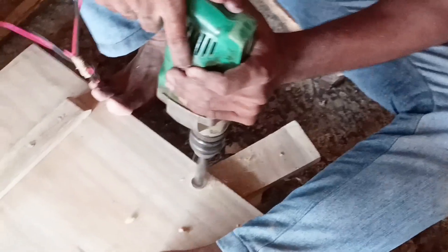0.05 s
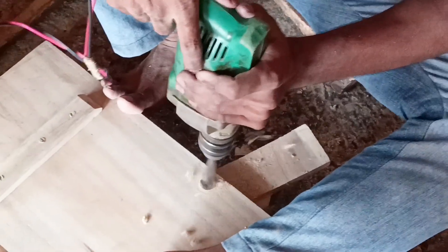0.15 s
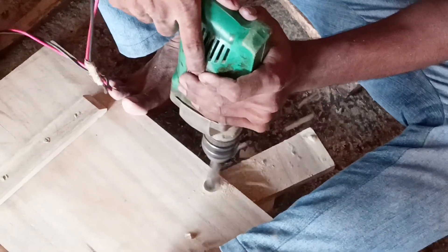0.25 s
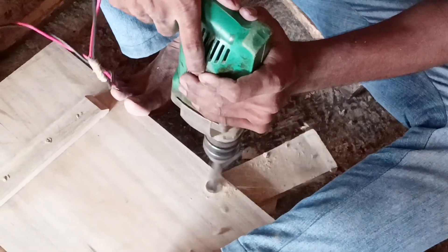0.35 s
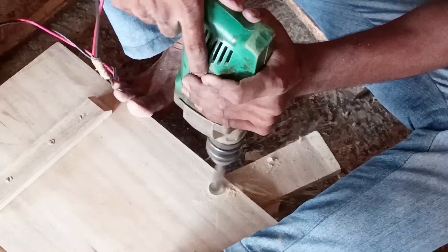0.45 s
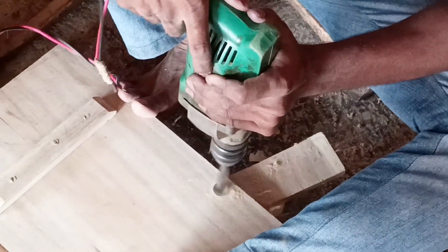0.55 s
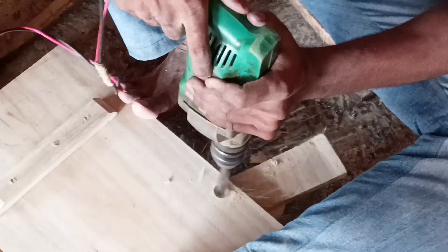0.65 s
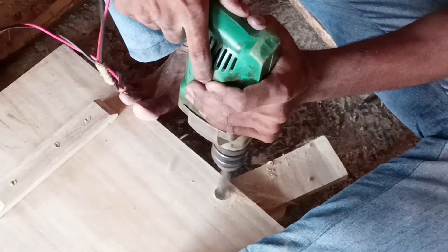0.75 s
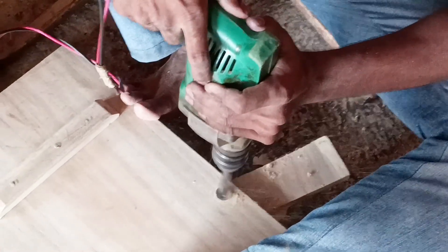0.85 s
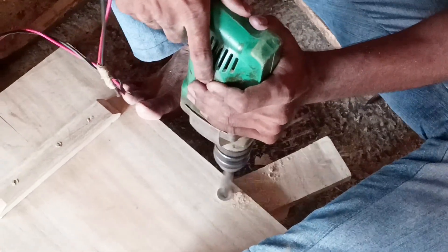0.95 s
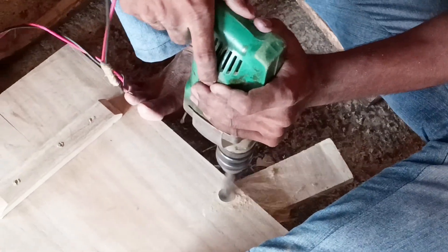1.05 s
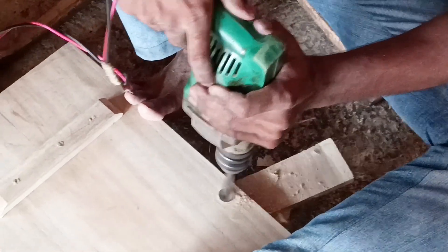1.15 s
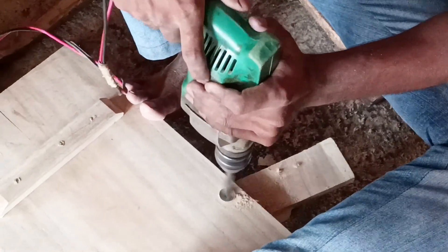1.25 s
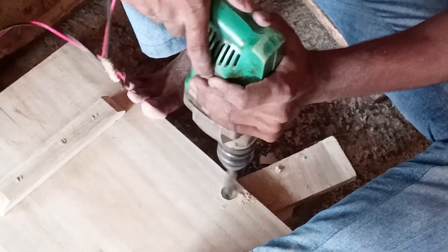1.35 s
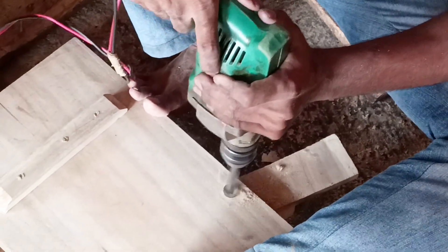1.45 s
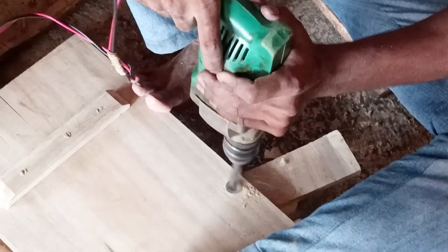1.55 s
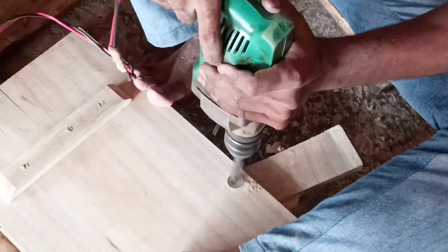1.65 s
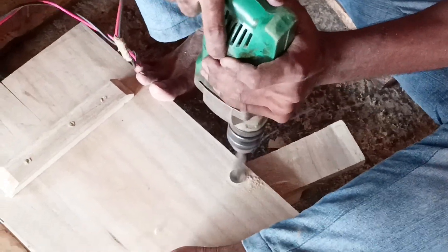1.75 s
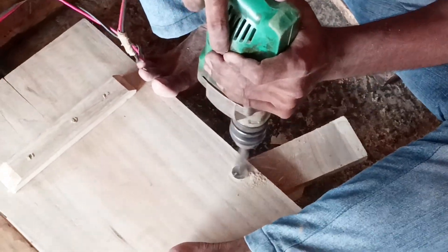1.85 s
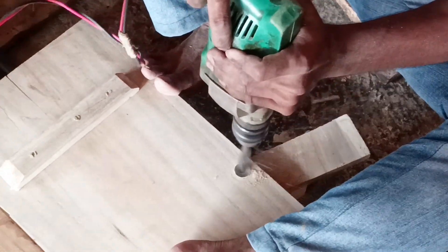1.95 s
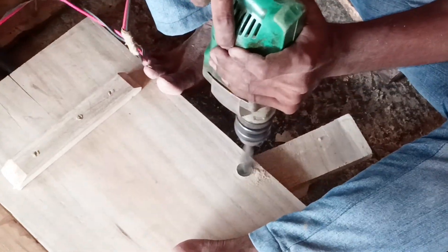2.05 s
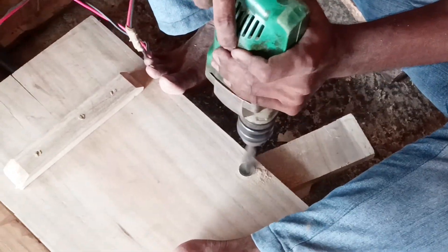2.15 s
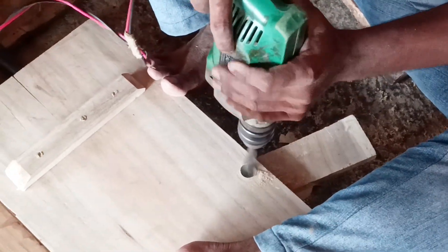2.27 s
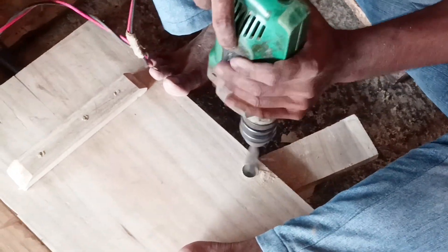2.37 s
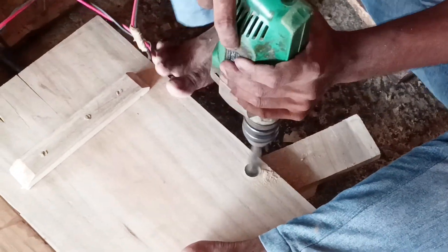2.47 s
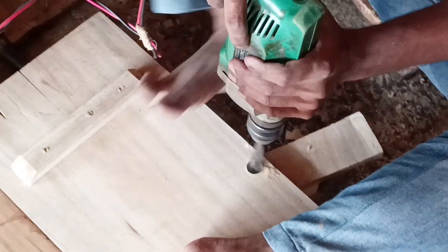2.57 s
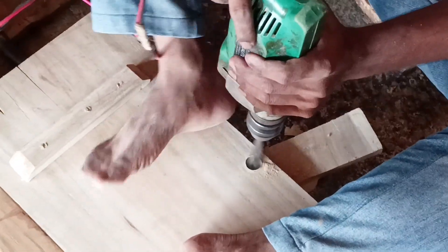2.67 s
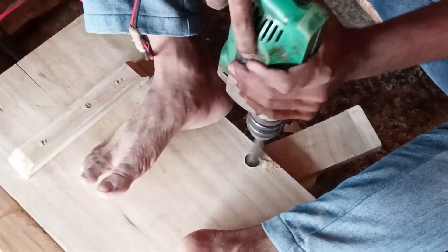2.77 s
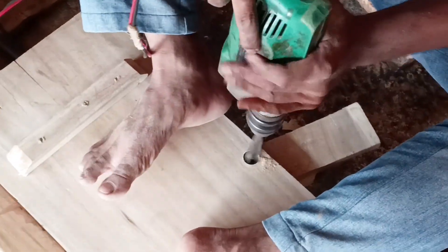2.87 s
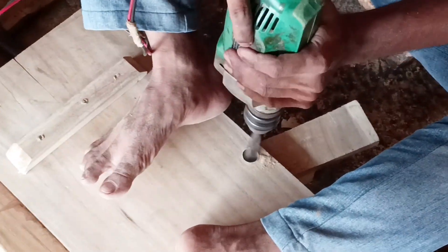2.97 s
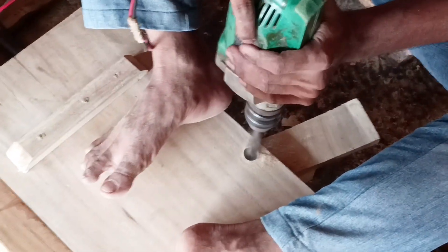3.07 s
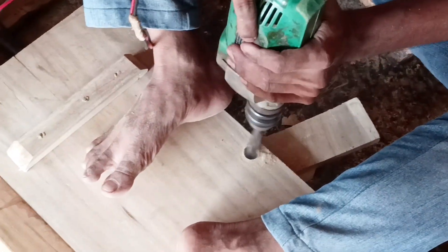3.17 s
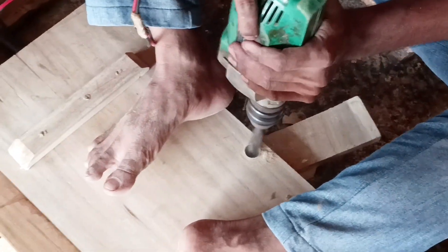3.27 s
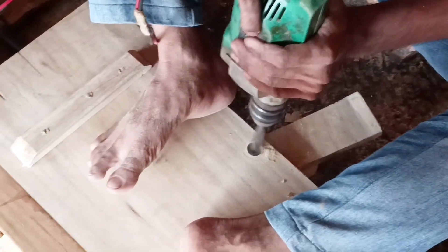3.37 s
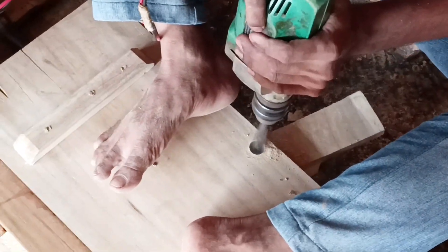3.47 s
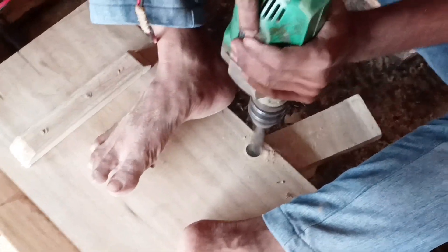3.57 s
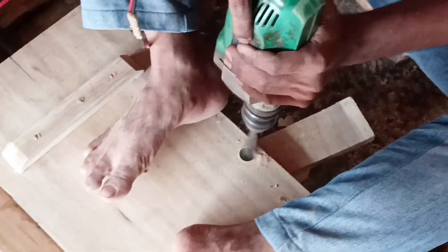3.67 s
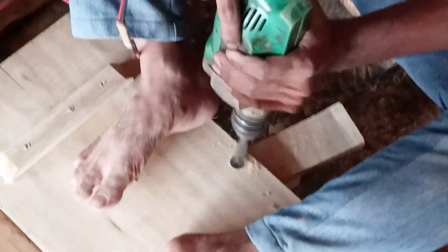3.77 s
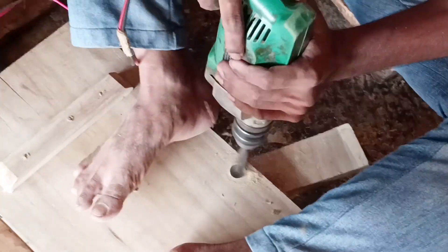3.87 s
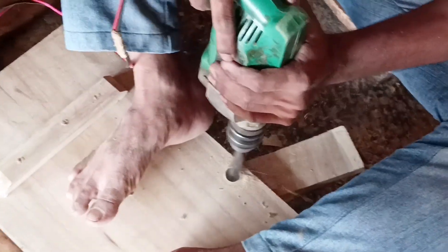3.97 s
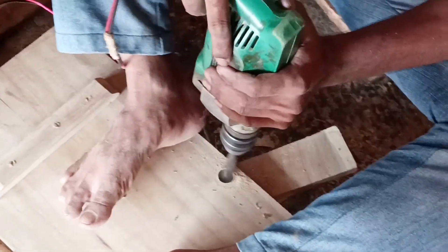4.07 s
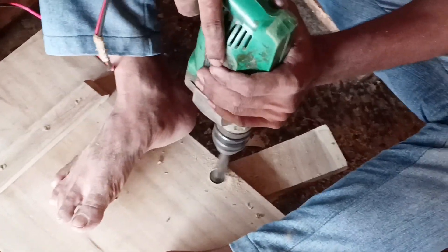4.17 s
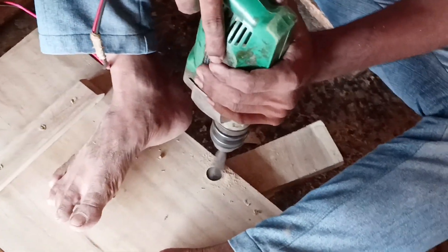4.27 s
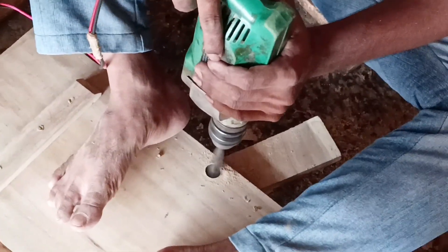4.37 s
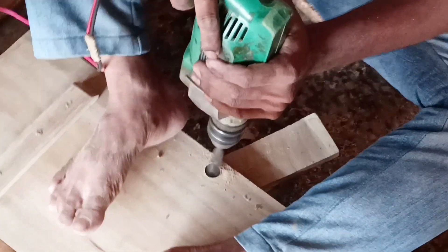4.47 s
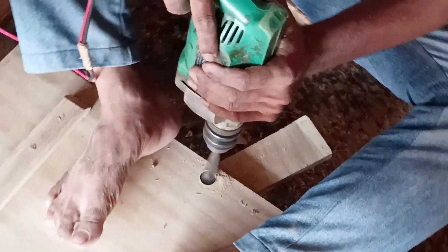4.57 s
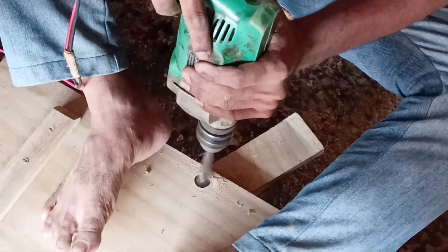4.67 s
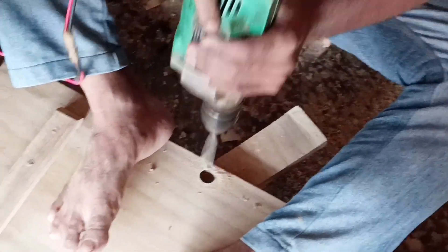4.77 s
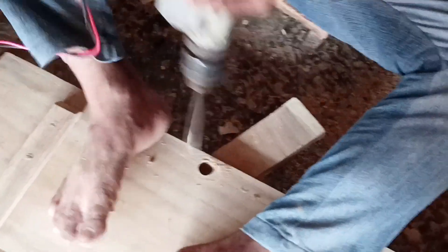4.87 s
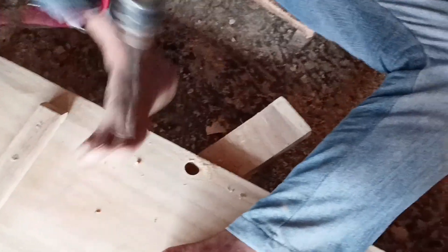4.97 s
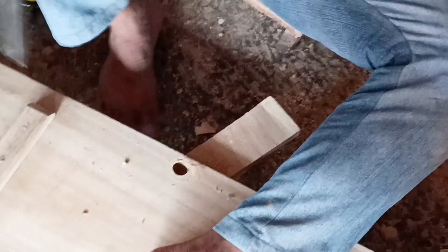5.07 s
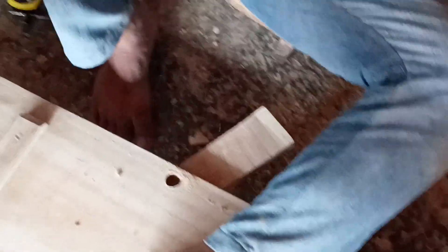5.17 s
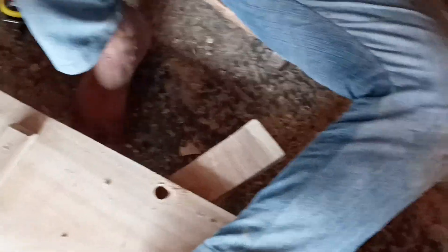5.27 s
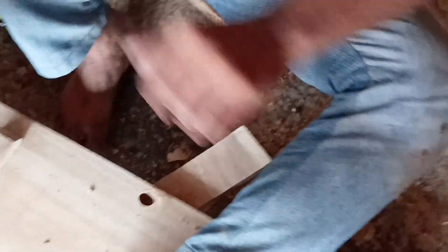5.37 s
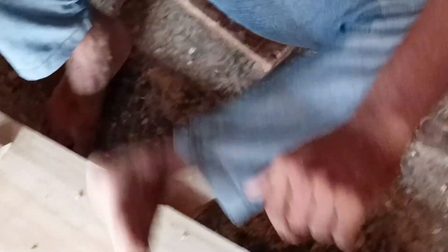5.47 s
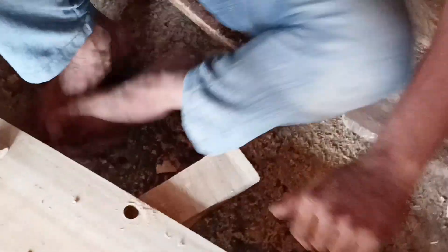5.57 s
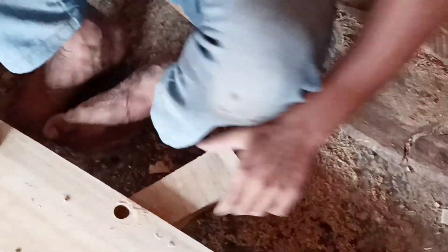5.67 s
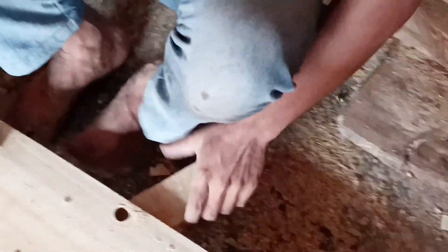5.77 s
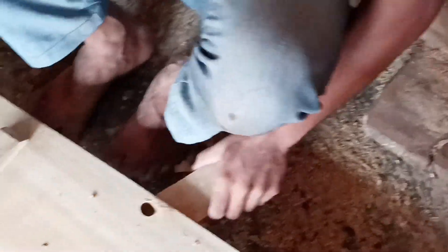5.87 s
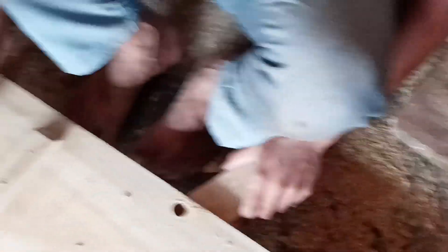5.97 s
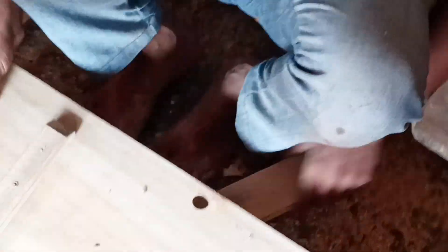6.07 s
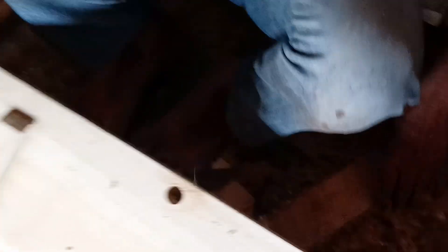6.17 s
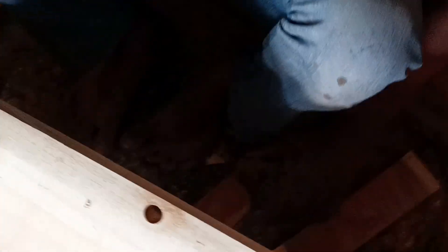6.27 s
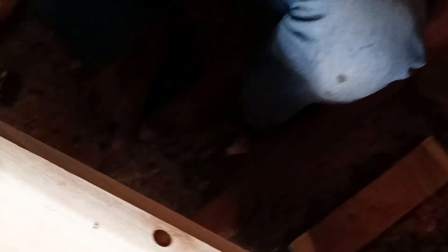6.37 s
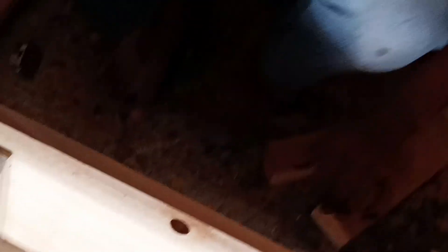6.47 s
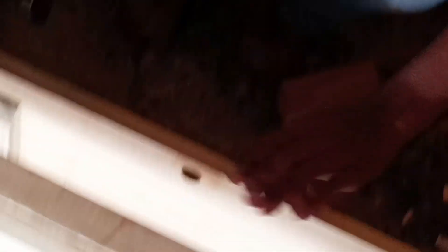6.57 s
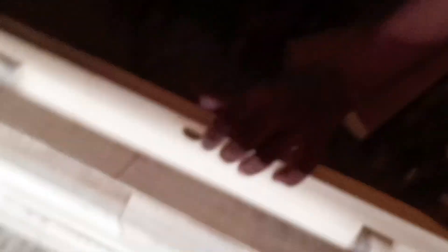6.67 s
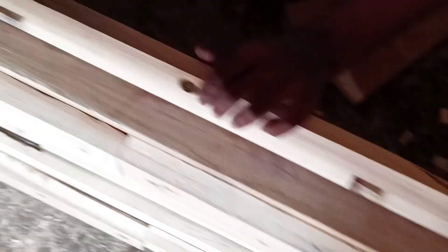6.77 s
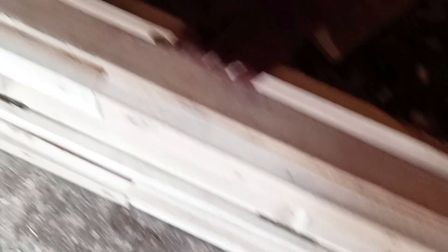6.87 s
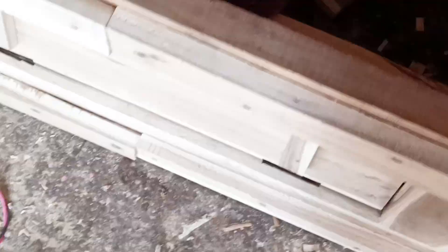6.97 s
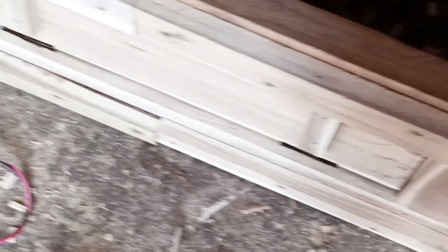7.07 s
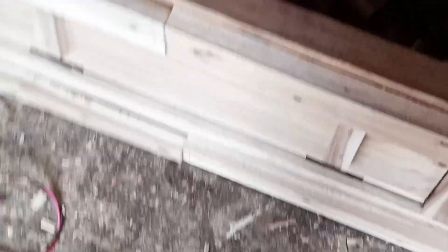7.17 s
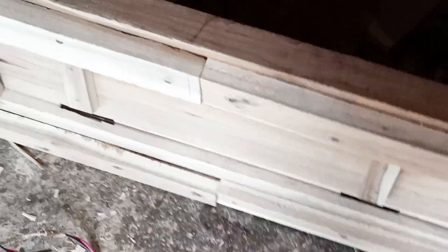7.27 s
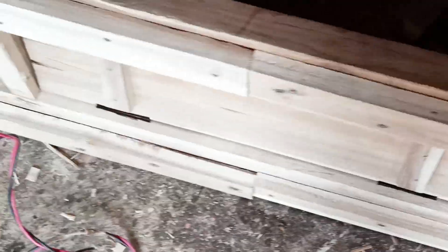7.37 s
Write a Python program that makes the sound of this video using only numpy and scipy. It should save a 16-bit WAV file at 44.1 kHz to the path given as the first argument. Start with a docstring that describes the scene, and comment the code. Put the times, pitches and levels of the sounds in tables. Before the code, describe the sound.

A corded drill whines and rasps into a wooden panel in four short runs, coasts down to silence, then tool and wood knocks follow.

```python
"""A corded drill bores into a wooden panel in four short runs: wavering sines locked to its speed make
the gear whine, and noise in bands and narrow rings makes the fan, panel and cutting sounds.
It coasts to a stop. Short grainy bursts ring like the drill laid down and like wood knocked and moved.
Two rough sines make a brief far-off toot; low noise makes moving air puff at the two microphone ports.
Under it all lies the murmur of the shop, a soft noise that swells in five bands."""
import sys
import numpy as np
from scipy import signal
from scipy.fft import rfft, irfft, next_fast_len
from scipy.io import wavfile
from scipy.ndimage import uniform_filter1d

SR = 44100
rng = np.random.default_rng(int(sys.argv[2]) if len(sys.argv) > 2 else 0)


def int16_out(signal):
    """Quantize to a 16-bit WAV file."""
    q = np.round(np.clip(np.atleast_2d(signal).T, -1, 1) * 32767)
    wavfile.write(sys.argv[1], SR, q.astype(np.int16))


N = 327212
STEP = 64   # samples between control points

# Levels in the tables are starting values: the functions add their own offsets and wavering.
# Drill speed, smoothed later; four pulls with coasting between: (time [s], gear mesh [Hz])
DRILL_SPEED = [(0.0, 1550), (0.07, 2029), (0.14, 2355), (0.22, 2527), (0.3, 2625), (0.379, 2671),
               (0.461, 2677), (0.54, 2730), (0.721, 2752), (0.821, 2783), (1.03, 2766), (1.1, 2684),
               (1.27, 2084), (1.4, 1696), (1.45, 2034), (1.5, 2318), (1.58, 2596), (1.661, 2654),
               (1.84, 2823), (1.93, 2872), (2.14, 2883), (2.21, 2728), (2.499, 1884), (2.75, 1310),
               (2.92, 1107), (3.001, 2107), (3.05, 2460), (3.109, 2614), (3.2, 2835), (3.301, 2878),
               (3.399, 2895), (3.52, 2975), (3.69, 2435), (3.761, 2648), (3.86, 2794), (3.95, 2510),
               (4.14, 2092), (4.37, 1593), (4.639, 1130), (4.75, 1015), (5.45, 398)]
# Pulls of the trigger: (on [s], off [s], mesh whine [dB], slot tone [dB], mesh octave [dB],
# armature hum [dB], third partial in coasting [dB], extra octave in the run-up [dB],
# extra body rings below 1.4 kHz [dB], extra body rings from 1.4 to 2 kHz [dB]); tones are re the roar
TRIGGER_PULLS = [(-0.1, 1.113, -7.5, -15.5, -32, -12.5, -2, 21, 6, 5.1),
                 (1.395, 2.179, -6, -10, -27.5, -12, -4.5, 13.1, 2.2, 0.5),
                 (2.927, 3.558, -8.5, -5.5, -28.5, -6, -15, 15.7, 3.5, 8.5),
                 (3.688, 3.891, -11.5, -4, -19, -17, -22, 6.2, 4.3, 6.7)]
# Roughness of the slot tone's pitch in each pull, before tone() scales it: (roughness [Hz])
SLOT_BLUR = [70, 50, 12, 45]
# How hard the gear teeth sing: (time [s], added to the whine [dB])
TEETH_SINGING = [(0, 5), (0.09, -4), (0.12, 2), (0.16, -0.5), (0.21, -0.5), (0.26, -5), (0.35, -2),
                 (0.47, 7.5), (0.56, 1.5), (0.6, -6), (0.66, -8), (0.69, 4.5), (0.75, 3), (1.0, 4),
                 (1.1, 4), (1.15, 2), (1.24, -3), (1.3, 1), (1.36, -15), (1.45, -8), (1.5, 6.5), (1.55, 6),
                 (1.95, -6), (2.1, -26), (2.32, 3), (2.4, -2.5), (2.5, -9), (2.63, 11), (2.9, -21.5),
                 (3.035, -5), (3.055, 1.5), (3.3, -3), (3.42, -6.5), (3.51, 4.5), (3.58, -22), (3.64, 1.5),
                 (3.94, 8), (3.99, -12), (4.25, -21.5), (4.36, 9.5), (4.5, -3), (4.58, -8), (4.64, 14.5),
                 (4.69, 6.5), (4.85, -22)]
# How two tones come and go in the roar: (time [s], slot tone [dB], mesh octave [dB])
TONE_STRANDS = [(0, 0, 0), (0.1, 0, 2), (0.14, 0, -4), (0.2, 0, 3), (0.3, -2, 4), (0.4, -8, -5),
                (0.7, -2, -6), (1.4, -3, -3), (1.47, 6, 0), (1.51, 4, -4), (1.56, -2, -2), (1.62, -6, -4),
                (1.7, -6, 2), (1.78, -4, -5), (2.1, 0, -6), (2.25, -3, -4), (2.32, 1, -9), (2.6, -6, -9),
                (2.95, -8, 0), (3.04, -8, 5), (3.13, -10, 4), (3.17, 3, 5), (3.23, 0, -9), (3.3, -5, -12),
                (3.36, 0, -10), (3.5, -1, -10), (3.54, -4, -8), (3.6, 0, -8), (3.64, -12, -10),
                (3.73, -3, -12), (3.76, -15, -9), (3.81, -5, -6), (3.87, -7, -2), (3.91, -16, -10),
                (4.0, -10, -12), (4.08, -4, -10), (4.2, 6, -8), (4.26, -8, 3), (4.31, -8, 0),
                (4.38, -8, -5), (4.45, -10, -10), (4.62, -8, -1), (4.72, -10, -8)]
# Noise of the drill: (time [s], roar [dB], panel rumble re roar [dB], fan hiss re roar [dB])
DRILL_LOAD = [(0.0, -26.5, -1.5, -7.5), (0.07, -27, -4, -2), (0.18, -26.5, -0.5, -17), (0.28, -29, -6, -9),
              (0.76, -30, -5.5, -5.5), (1.38, -33, -3.5, -6.5), (1.55, -31, -3, -6.5), (2.02, -30, -2, -4),
              (2.46, -32, -2, -4), (2.77, -35.5, -0.5, -7.5), (2.91, -45, 7.5, -22), (2.94, -40, -6, -24),
              (2.99, -30, -9.5, -10), (3.13, -31, -2.5, -1.5), (3.36, -30, -6, -4.5),
              (3.5, -33, -2.5, -1.5), (3.82, -30.5, -8, -4), (4.04, -34.5, -4, -0.5), (4.39, -33, -8, -6),
              (4.47, -38.5, -6, -0.5), (4.65, -35.5, -8, -10), (4.82, -46.5, -7, -6), (5.05, -51, -8, -7.5),
              (5.45, -67, 8, -6)]
# Colour of the roar: (frequency [Hz], level per Hz [dB])
ROAR_COLOUR = [(300, -58), (400, -30.5), (560, -30), (700, -27), (900, -31), (1400, -21), (2000, -14.5),
               (2700, -6), (4600, -7), (5600, -10), (6800, -8.5), (9000, -16.5), (11000, -32.5),
               (13800, -55), (14050, -29), (15800, -16)]
# Lesser tones, two tables side by side: (armature speed [times], ball rate [times]) and (level re roar [dB])
LESSER_TONES = [(0, 2), (0, 3), (0, 4), (0, 5), (0, 6), (0, 7), (7, 1), (3, 0)]
LESSER_TONE_DB = [-10.5, -9.5, -15, -11.5, -52, -17, -11, 1]
# Housing resonances that a passing tone wakes: (centre [Hz], width [Hz], level [dB])
HOUSING_RINGS = [(1093.7, 22, 14.5), (1510, 56.3, 0), (2140, 370, 5), (2550, 130, 7), (2668, 11.7, 13.5),
                 (2783, 37, 11.5), (2872, 21, 19), (3200, 48, 9), (3630, 120, 5.5), (4140, 150, 11),
                 (4676, 40, 12), (4530, 174, 14.5), (6150, 350, 9.5)]
# Ring that the second ball tone wakes in coasting: (centre [Hz], width [Hz], level [dB])
BALL_TONE_RING = [(1150, 60, 30)]
# Ring that swells the armature hum near top speed: (centre [Hz], width [Hz], level [dB])
ARMATURE_HUM_RING = [(435, 15, 18.5)]
# Ring where the third mesh partial sounds, applied twice: (centre [Hz], width [Hz], level [dB])
THIRD_PARTIAL_RING = [(6000, 900, 13)]
# Panel and housing resonances heard in the noise: (centre [Hz], width [Hz], level re their band [dB])
BODY_RINGS = [(1080, 140, -13.5), (1295, 56, -25), (1578, 62, -10.5), (1710, 30, -15), (3424, 120, -10.5),
              (3746, 30, -12.5), (4580, 70, -20.5), (5440, 29, -21)]
# Strands of the gritty run-up band: (armature speed [times], level [dB])
GRITTY_STRANDS = [(10, -23), (12, -17), (14, -32), (21, -14.5)]
# Ring where the gritty band is loudest: (centre [Hz], width [Hz], level [dB])
GRITTY_RING = [(3500, 600, 23)]
# The bit catches: (time [s], panel ring re roar [dB], thud re roar [dB])
BIT_CATCHES = [(0.071, -5.5, -11.5), (0.3, -14, -32), (0.484, 0.5, -38), (0.76, -20, -20), (1.468, -5, -39),
               (1.55, -25, -7.5), (2.02, -10.5, -40), (2.46, -13, -15), (2.879, 2.5, -9.5),
               (3.029, -18, -37), (3.565, -17, -18), (3.135, -9, -42), (3.26, -6.5, -43)]
# Low rumble of moving air: (time [s], left [dB], right [dB])
GUST_LEVELS = [(0, -46.5, -46), (1, -40.5, -47), (2, -39, -38.5), (3, -47, -48.5), (3.9, -43.5, -43.5),
               (4.5, -47.5, -43), (6, -46.5, -37), (7.42, -44, -52.5)]
# Strongest puffs of air: (time [s], level [dB], port [0 left, 1 right], centre [Hz])
AIR_PUFFS = [(0.516, -31.5, 0, 119.2), (0.601, -31.5, 0, 113), (1.433, -32.5, 1, 199), (1.857, -34, 0, 149),
             (2.144, -28.5, 1, 221.7), (2.275, -27, 0, 113), (2.354, -27.5, 0, 114),
             (2.948, -32.5, 1, 217.9), (3.035, -46, 0, 418.8), (3.564, -31.5, 0, 238.5),
             (3.851, -27, 0, 122.5), (4.005, -32, 1, 152.5), (4.199, -24.5, 0, 110),
             (4.271, -25.5, 0, 155.2), (4.447, -31.5, 1, 255.8), (4.475, -26.5, 1, 210.6),
             (4.58, -29.5, 0, 100.3), (4.779, -18.5, 0, 108.8), (4.996, -30.5, 1, 172.6),
             (5.076, -20, 0, 166), (5.159, -39.5, 1, 326), (5.175, -23, 0, 132), (5.235, -32.5, 0, 110.5),
             (5.406, -32, 0, 154), (5.472, -32, 1, 133), (5.504, -21, 0, 181), (5.573, -41.5, 1, 332),
             (5.589, -29, 0, 115), (5.709, -24, 0, 243), (5.708, -27, 1, 208), (5.874, -24.5, 0, 191),
             (5.893, -19.5, 0, 223), (5.916, -36, 1, 364), (5.987, -17.5, 0, 126), (6.007, -21, 0, 106),
             (6.036, -22, 0, 272), (6.077, -32, 0, 147), (6.334, -22, 0, 131), (6.369, -32, 0, 115),
             (6.425, -25, 0, 109), (6.73, -19, 0, 228), (6.747, -26, 0, 150), (6.77, -23, 0, 98),
             (7.006, -30, 1, 148), (7.026, -21.5, 0, 138), (7.238, -32, 1, 175), (7.306, -28, 0, 107),
             (7.335, -22, 0, 102)]
# Colour of the shop murmur: (frequency [Hz], level per Hz [dB])
SHOP_COLOUR = [(300, -1), (500, -12), (800, -10), (1500, -5.5), (2400, -3.5), (3600, -10.5), (4800, -17),
               (6500, -16.5), (7400, -25.5), (9000, -33), (15800, -39)]
# Loudness of the shop murmur: (time [s], level [dB])
SHOP_LEVEL = [(5.0, -39), (5.44, -49), (6.47, -55), (7.05, -51), (7.42, -51.5)]
# Knocks and scuffs: (time [s], level at 2 kHz [dB], then re that: level at 0.7, 5 and 11 kHz [dB],
# loudest ring [Hz], its level [dB], rise [ms], left minus right [dB])
WOOD_KNOCKS = [(5.281, -24.5, -11, 4.5, -10, 3643, 23, 11, -1),
               (5.351, -29.5, -36, -4, -23, 2170, 15, 12.6, -3),
               (5.696, -11, -10, -6, -10, 1200, 8.5, 10.4, 2.5),
               (5.836, -27, -25, -7.5, -25, 2290, 12, 10, 0), (5.858, -60, 13, -12, -29, 830, 35.7, 8, 5),
               (6.032, -70.5, 29, 0.5, -23, 544, 30.5, 4.2, 12),
               (6.227, -7, -22, -9, -62, 2390, 3, 9, -0.5), (6.4, -44.5, 2, 0, -24, 1600, 12, 15, 0),
               (6.495, -43.5, -6, -9, -37, 1220, 20, 9.5, 0), (6.727, -68.5, 23, -2, -20, 566, 18, 3, 10),
               (6.862, -26, 1, -25, -32, 1305, 24, 2.9, 13), (6.882, -24, -6, -4, -16, 1600, 13, 10, -2),
               (6.926, -15, 0, -10, -24, 818, 14.7, 26, 3),
               (7.042, -36.5, -15, -3, -34, 1280, 19, 3.2, 2.5),
               (7.19, -41, -12, -5, -30, 2000, 14, 13.5, 0),
               (7.254, -17.5, -0.5, -9.5, -26, 1080, 16.5, 16, 3)]
# Where the colour of a knock is set: (frequency [Hz])
KNOCK_COLOUR_HZ = [700, 2000, 5000, 11000]
# Modes of the drill laid down: (centre [Hz], width [Hz], level [dB])
TOOL_MODES = [(1514, 60, 14), (2063, 60, 9), (2725, 70, 12), (3160, 160, 10), (4180, 160, 11),
              (4866, 60, 6), (6027, 80, 14), (6418, 70, 10)]
# Modes of the wood: (centre [Hz], width [Hz], level [dB])
WOOD_MODES = [(550, 90, 13), (770, 110, 12), (1120, 180, 9), (1590, 90, 8), (1960, 160, 8), (2340, 160, 7),
              (3300, 90, 9), (4200, 110, 9), (4840, 90, 8), (6120, 110, 11), (7010, 100, 8)]
# Partials of the toot: (frequency [Hz], level [dB])
TOOT_PARTIALS = [(2860, -51), (3280, -54)]
# Span of the toot: (start [s], end [s])
TOOT_SPAN = (5.915, 6.04)
# How alike the two sides are: (frequency [Hz], likeness [0 to 1])
SIDE_LIKENESS = [(300, 0.71), (800, 0.97), (1300, 0.87), (2500, 0), (6000, 0.19), (15000, .0)]
# Balance of the two sides: (frequency [Hz], left minus right [dB])
SIDE_BALANCE = [(300, 2.5), (700, 2.5), (1300, 11), (2300, 0), (4400, -1), (15000, -0.5)]

PINION_TEETH, ARMATURE_SLOTS, BALLS_PER_TURN = 7, 12, 2.76
MESH_DB_PER_OCTAVE = 9   # the whine sinks as the speed falls
COAST_MESH_DB, COAST_SLOT_DB, COAST_OCTAVE_DB = -1.5, -5, 9.5   # change once the power is off
COAST_FLUTTER_DB = 2.2   # unloaded teeth waver more
COAST_SMOOTH = 0.55   # share of the roughness left once the power is off
MOST_STRAIN = 7   # ceiling on the roughness, before coasting smooths it
OCTAVE_FOLLOWS = .5   # share of the teeth's swing in the mesh octave
SLOT_RUN_UP_DB = -9   # the clean slot tone is buried while the speed climbs
PANEL_HZ, PANEL_WIDTH_HZ = 807, 18
VENT_HZ, VENT_WIDTH_HZ, VENT_DB = 10170, 330, -18.5   # broad ring of the fan hiss; level re hiss
GRITTY_BLUR = 170   # how fast each gritty strand wavers, times a second
CATCH_S, PANEL_REST_DB, THUD_REST_DB = 0.032, -20, -18.5   # spread of a catch; levels between catches
PUFF_S = 0.0098   # spread of a puff
PUFF_SNAP = 25.6   # size of the sudden push inside a puff, before filtering
KNOCK_MS = 23.4   # a contact dies faster after this
TOOL_DOWN_S = 5.5   # earlier knocks ring the drill, later ones the wood
LEFT_LAG = 37   # samples by which shared noise is late on the left
CUTOFF_HZ = 15740


def from_db(db):
    """Turns decibels into gain."""
    return 10 ** (np.asarray(db, float) / 20)


def to_db(gain):
    """Turns gain into decibels."""
    return 20 * np.log10(gain)


def rms_one(x):
    """Scales a sound to an rms (average strength) of 1."""
    return x / np.sqrt(np.mean(x ** 2) + 1e-20)


def control_times():
    """Times of the control points in seconds."""
    return np.arange(N // STEP + 2) * STEP / SR


def in_time(rows):
    """Reads the curves of a table at every control point."""
    s, *columns = np.transpose(rows)
    return [np.interp(control_times(), s, c) for c in columns]


def per_second(control):
    """Change per second of a control curve."""
    return np.gradient(control) * SR / STEP


def each_sample(control):
    """Joins control points by straight lines."""
    c = np.atleast_2d(control)
    ramp = np.arange(STEP) / STEP
    lines = c[:, :-1, None] + np.diff(c)[:, :, None] * ramp
    return lines.reshape(len(c), -1)[:, :N]


def at_hz(points, hz):
    """Reads a frequency table on a logarithmic frequency axis."""
    table_hz, values = np.array(points).T
    return np.interp(np.log(np.maximum(hz, 1)), np.log(table_hz), values)


def drift(rate, channels=1):
    """Smooth chance wandering with a spread of 1, changing about rate times a second."""
    r = np.exp(-2 * np.pi * rate * STEP / SR)
    white = rng.standard_normal((channels, N // STEP + 1002))
    smooth = signal.lfilter([1], [1, -2 * r, r * r], white)
    return rms_one(smooth[:, 1000:])   # skip the filter's start


def peaks_gain(modes, hz):
    """Gain of resonances standing on a flat response of 1."""
    peaks = sum(from_db(2 * db) / (1 + (2 * (hz - f) / width) ** 2) for f, width, db in modes)
    return np.sqrt(1 + peaks)


def sides(hz):
    """Left and right gains of the two ports at a frequency."""
    half = at_hz(SIDE_BALANCE, hz) / 2
    return from_db([half, -half])


def stereo_noise(gain_of_hz):
    """Coloured noise; the part that both ports share reaches the left one later."""
    size = next_fast_len(N)
    hz = np.fft.rfftfreq(size, 1 / SR)
    shared, left, right = rng.standard_normal((3, len(hz))) + 1j * rng.standard_normal((3, len(hz)))
    alike = np.clip(at_hz(SIDE_LIKENESS, hz), 0, 1)
    late = np.exp(-2j * np.pi * hz * LEFT_LAG / SR)
    common = np.sqrt(alike) * shared * np.array([late, 1 + 0 * late])
    own = np.sqrt(1 - alike) * np.array([left, right])
    return rms_one(irfft((common + own) * gain_of_hz(hz) * sides(hz), size)[:, :N])


def tone(hz, level_db, flutter_db, blur):
    """A gliding sine with unsteady pitch; level and phase waver separately at each port."""
    unsteady_hz = hz + 1.2 * blur * drift(187.8)
    phase = 2 * np.pi * np.cumsum(each_sample(unsteady_hz)) / SR
    apart = .55 * np.array([[1], [-1]]) + .25 * drift(4, channels=2)   # radians
    gain = from_db(level_db + flutter_db * drift(29.7, channels=2)) * sides(hz)
    return np.sqrt(2) * each_sample(gain) * np.sin(phase + each_sample(apart))


def ringing(white, hz, width_hz, level_db):
    """Noise in one resonance, swelling in lumps."""
    r = np.exp(-np.pi * width_hz / SR)
    rung = signal.lfilter([1, 0, -1], [1, -2 * r * np.cos(2 * np.pi * hz / SR), r * r], white)
    gain = from_db(level_db + 3.95 * drift(11.5)) * sides(hz)[:, None]
    return rms_one(rung) * each_sample(gain)


def gritty(hz, level_db):
    """A narrow band of noise whose centre glides, unrelated at the two ports."""
    phase = 2 * np.pi * np.cumsum(each_sample(hz)) / SR
    grain = each_sample(drift(GRITTY_BLUR, channels=4))
    strand = grain[:2] * np.sin(phase) + grain[2:] * np.cos(phase)
    return each_sample(from_db(level_db) * sides(hz)) * strand


def add(out, at_s, burst):
    """Mixes a short burst in at its time."""
    i = max(round(at_s * SR), 0)
    out[..., i:i + burst.shape[-1]] += burst[..., :N - i]


def trigger():
    """Share of coasting (1 idle, 0 driven) and the settings of the latest pull, smoothed."""
    t = control_times()
    on, off, *levels = np.transpose(TRIGGER_PULLS)
    latest = np.searchsorted(on, t) - 1
    settings = np.array(levels + [SLOT_BLUR])[:, latest]
    return uniform_filter1d([t > off[latest], *settings], size=30, axis=1)


def catches():
    """Levels of panel ring and thud: a rest level plus a swell at each catch of the bit."""
    s, ring_db, thud_db = np.transpose(BIT_CATCHES)
    swell = np.exp(-.5 * ((control_times()[:, None] - s) / CATCH_S) ** 2)
    panel = from_db(PANEL_REST_DB) + swell @ from_db(ring_db)
    thud = from_db(THUD_REST_DB) + swell @ from_db(thud_db)
    return to_db(panel), to_db(thud)


def drill():
    """Tones locked to the armature over noise ringing in housing and panel."""
    mesh_hz = np.exp(in_time([(s, np.log(hz)) for s, hz in DRILL_SPEED])[0])
    mesh_hz = uniform_filter1d(mesh_hz, size=20)
    turns = mesh_hz / PINION_TEETH   # armature turns per second
    speed = turns / turns.max()
    roar_db, rumble_db, hiss_db = in_time(DRILL_LOAD)
    teeth_db, = in_time(TEETH_SINGING)
    slot_comes_db, octave_comes_db = in_time(TONE_STRANDS)
    panel_db, thud_db = catches()
    (idle, mesh_db, slot_db, octave_db, hum_db, third_db,
     run_up_db, lower_db, upper_db, slot_blur) = trigger()

    def sung(hz, level_db, coast_db):
        """Level of a tone as the housing passes it on."""
        return roar_db + level_db + coast_db * idle + to_db(peaks_gain(HOUSING_RINGS, hz))

    # changing or low speed roughens the tones
    strain = np.abs(per_second(turns)) / 60 + 6 * (1 - speed)
    strain = np.minimum(strain, MOST_STRAIN) * (1 - (1 - COAST_SMOOTH) * idle)
    gaining = np.clip(per_second(turns) / 700, .03, 1)

    whine_db = mesh_db + teeth_db + MESH_DB_PER_OCTAVE * np.log2(speed)
    out = tone(mesh_hz, sung(mesh_hz, whine_db, COAST_MESH_DB),
               flutter_db=3.0 + COAST_FLUTTER_DB * idle, blur=5.0 + (3.0 + 2.5 * idle) * strain)

    slot_hz = ARMATURE_SLOTS * turns
    slot_db = slot_db + slot_comes_db + SLOT_RUN_UP_DB * np.sqrt(gaining)
    out += tone(slot_hz, sung(slot_hz, slot_db, COAST_SLOT_DB),
                flutter_db=4.5, blur=slot_blur + 8.0 * strain)

    # the run-up lifts the octave only once the mesh passes 1900 Hz
    run_up = np.clip(4 * gaining - .12, 0, 1) * np.clip(mesh_hz / 500 - 3.8, 0, 1)
    octave_db = octave_db + octave_comes_db + OCTAVE_FOLLOWS * teeth_db + run_up_db * run_up
    out += tone(2 * mesh_hz, sung(2 * mesh_hz, octave_db, COAST_OCTAVE_DB),
                flutter_db=5.0, blur=34.0 + 8.0 * strain)

    fading_db = 4.65 + 35 * np.log10(speed)   # slow running buries the lesser tones
    for (order, balls), level_db in zip(LESSER_TONES, LESSER_TONE_DB):
        hz = (order + balls * BALLS_PER_TURN) * turns
        ball_ring_db = idle * (balls == 2) * to_db(peaks_gain(BALL_TONE_RING, hz))
        out += tone(hz, roar_db + level_db + at_hz(ROAR_COLOUR, hz) + fading_db + ball_ring_db,
                    flutter_db=5.0, blur=9.0 + 14.0 * strain)

    hum_ring_db = to_db(peaks_gain(ARMATURE_HUM_RING, turns))
    out += tone(turns, roar_db + hum_db - 27.5 - 4.6 * idle + hum_ring_db,
                flutter_db=6.5, blur=9.4 + 6.124 * strain)

    # unloaded teeth sing on the third mesh partial
    coasting = np.clip(-per_second(turns) / 400, .02, 1)
    third_ring_db = 2 * to_db(peaks_gain(THIRD_PARTIAL_RING, 3 * mesh_hz))
    out += tone(3 * mesh_hz, roar_db + third_db - 28 + third_ring_db + fading_db + to_db(coasting),
                flutter_db=4.5, blur=50.0)

    load = roar_db - 0.5 + 0.063 * drift(11.0)   # the bit bites unevenly
    edges = [0, 720, 2000, 3200, 6300, SR]   # Hz, five bands of roar
    band_levels = [thud_db, rumble_db + 0.5, -3.0, -1.5, hiss_db]
    for low, high, level_db in zip(edges, edges[1:], band_levels):
        def colour(hz):
            """The roar's colour inside one band."""
            inside = 1 / np.sqrt((1 + (low / np.maximum(hz, 1)) ** 8) * (1 + (hz / high) ** 8))
            return inside * from_db(at_hz(ROAR_COLOUR, hz))
        waver_db = 1.8 * drift(67) + 1.0 * drift(11)
        out += stereo_noise(colour) * each_sample(from_db(load + level_db + waver_db))

    white = rng.standard_normal((3, N))
    own = white[:2]
    shared = np.array([np.roll(white[2], LEFT_LAG), white[2]])
    out += ringing(shared + .5 * own, PANEL_HZ, PANEL_WIDTH_HZ, load + panel_db)
    for hz, width_hz, level_db in BODY_RINGS:
        band_db = 0
        if hz < 2000:
            band_db = rumble_db + (lower_db if hz < 1400 else upper_db)
        out += ringing(own + 0.44 * shared, hz, width_hz, load + band_db + level_db)
    out += ringing(own, VENT_HZ, VENT_WIDTH_HZ, load + hiss_db + VENT_DB)

    for order, level_db in GRITTY_STRANDS:
        hz = order * turns
        out += gritty(hz, load + level_db + to_db(gaining * peaks_gain(GRITTY_RING, hz)))
    stopped = np.clip((DRILL_SPEED[-1][0] - np.arange(N) / SR) / 0.11, 0, 1)   # fades to silence
    return out * stopped


def wind():
    """Lumpy low rumble, unrelated at the two ports, and single puffs a few cycles long."""
    band = signal.butter(2, [72, 190], "band", fs=SR, output="sos")
    rumble = signal.sosfilt(band, rng.standard_normal((2, N)))
    lumps_db = 10.9 * np.minimum(drift(13.4, channels=2), 1.3)
    out = rms_one(rumble * each_sample(from_db(lumps_db))) * each_sample(from_db(in_time(GUST_LEVELS)))
    t = np.arange(-2048, 2048) / SR
    swell = np.exp(-.5 * (t / PUFF_S) ** 2)
    for s, level_db, port, hz in AIR_PUFFS:
        band = signal.butter(2, [hz / 2.37, hz * 1.597], "band", fs=SR, output="sos")
        turbulence = rng.standard_normal(len(t)) * swell
        push = PUFF_SNAP * rng.choice([-1, 1]) * (t == 0)
        puff = signal.sosfiltfilt(band, turbulence + push)
        same_energy = np.sqrt(swell @ swell / (puff @ puff))
        add(out[round(port)], s + t[0], puff * from_db(level_db) * same_energy)
    return out


def shop():
    """Murmur of the shop: coloured noise in five bands, each swelling on its own."""
    plain = stereo_noise(lambda hz: from_db(at_hz(SHOP_COLOUR, hz)))
    size = next_fast_len(N)
    hz, spectrum = np.fft.rfftfreq(size, 1 / SR), rfft(plain, size)
    out, edges = 0, [0, 700, 1400, 2600, 7500, SR]   # Hz
    for low, high in zip(edges, edges[1:]):
        band = irfft(spectrum * ((hz >= low) & (hz < high)), size)[:, :N]
        swell_db = 1.47 * drift(6) + 1.0 * drift(24, channels=2)
        out = out + band * each_sample(from_db(swell_db))
    return out * each_sample(from_db(in_time(SHOP_LEVEL)[0] - 5.0))


def knocks():
    """Each contact is a short grainy rub that rings the drill or the wood and dies in the room."""
    out, size, lead = np.zeros((2, N)), 8192, 512   # lead: samples of room before the burst
    t, hz = np.arange(size) / SR * 1000, np.fft.rfftfreq(size, 1 / SR)   # t in ms
    thin = 1 / np.sqrt(1 + (450 / np.maximum(hz, 1)) ** 8)   # takes the lows away
    for s, level_db, low_db, bright_db, top_db, ring_hz, ring_db, rise_ms, pan in WOOD_KNOCKS:
        dying = from_db(-.2 * t - 0.91 * np.maximum(t - KNOCK_MS, 0))
        contact = np.clip(t / rise_ms, 0, 1) ** 0.94 * dying
        tail = from_db(-15 - .3 * t) * np.clip(t / 10, 0, 1) * (t < 150)
        # table levels turned into levels per Hz
        per_hz = np.array([low_db, 0, bright_db, top_db]) - 10 * np.log10(np.array(KNOCK_COLOUR_HZ) / 2000)
        struck = TOOL_MODES if s < TOOL_DOWN_S else WOOD_MODES
        strengths = rng.normal(0, 3, len(WOOD_MODES))   # dB, each knock wakes the modes differently
        modes = [(f, width, db + k) for (f, width, db), k in zip(struck, strengths)]
        modes.append((ring_hz, 70, ring_db))
        colour = from_db(at_hz(list(zip(KNOCK_COLOUR_HZ, per_hz)), hz)) * peaks_gain(modes, hz) * thin
        grain = rng.standard_normal((3, size))
        rub = (grain[:2] + 0.28 * grain[2]) * (contact + tail)
        burst = irfft(rfft(np.roll(rub, lead, axis=1)) * colour, size)
        gain = from_db(level_db - 9.0 + np.array([[pan / 2], [-pan / 2]]))
        add(out, s - rise_ms / 2000 - lead / SR, burst * gain)
    return out


def toot():
    """Two rough neighbouring partials that rise a little in pitch, faded in and out."""
    t = np.arange(N) / SR
    start, end = TOOT_SPAN
    gate = np.clip(np.minimum(t - start, (end - t) / 1.7) / 0.025, 0, 1)
    rising = 1 + .25 * np.clip(control_times() - 5.95, 0, .1)
    out = 0
    for hz, level_db in TOOT_PARTIALS:
        throb_db = 5.0 * drift(45)
        out = out + tone(hz * rising, level_db + throb_db, flutter_db=3.5, blur=30.0)
    return gate * out


def scene():
    """All sources over the murmur of the shop."""
    return drill() + wind() + shop() + knocks() + toot()


def record(dry):
    """Cuts the top of the treble steeply with a low-pass filter."""
    low_pass = signal.ellip(12, .5, 70, CUTOFF_HZ, fs=SR, output="sos")
    return signal.sosfilt(low_pass, dry)


dry = scene()
out = record(dry)
int16_out(out)
```